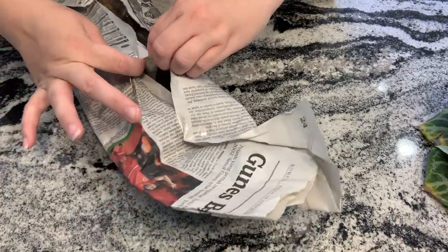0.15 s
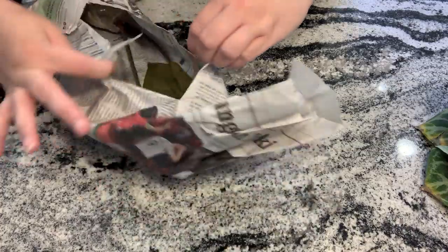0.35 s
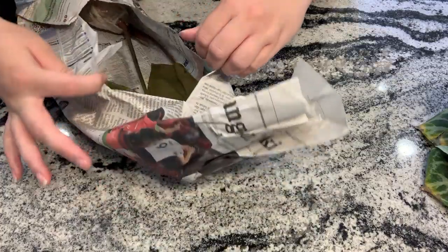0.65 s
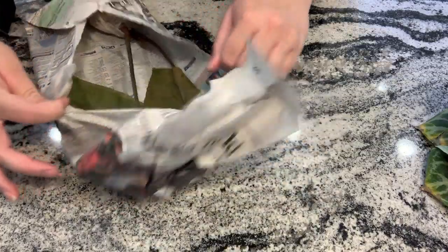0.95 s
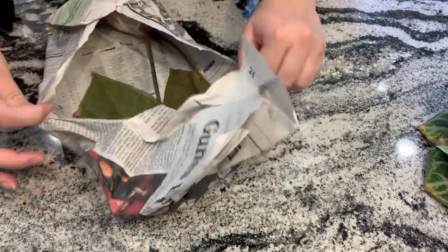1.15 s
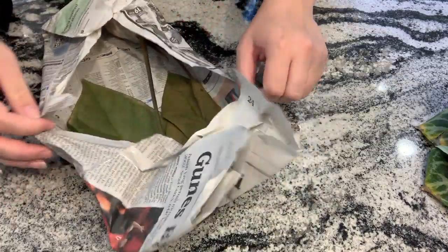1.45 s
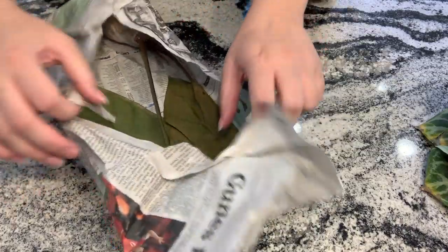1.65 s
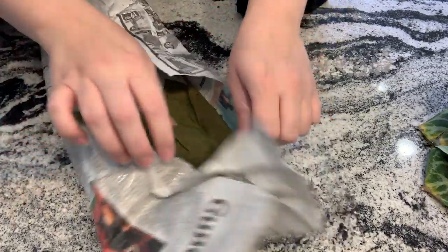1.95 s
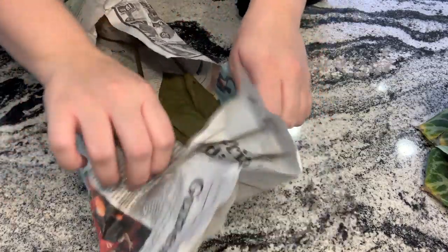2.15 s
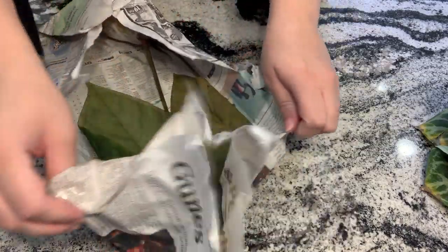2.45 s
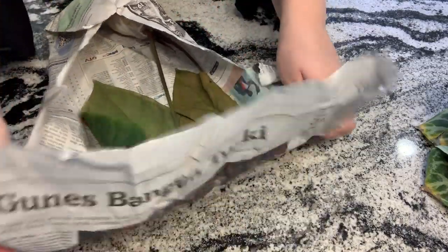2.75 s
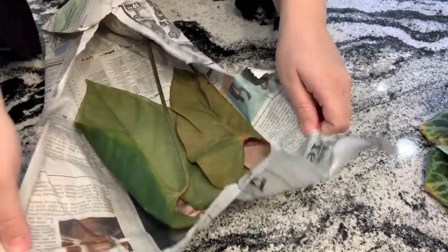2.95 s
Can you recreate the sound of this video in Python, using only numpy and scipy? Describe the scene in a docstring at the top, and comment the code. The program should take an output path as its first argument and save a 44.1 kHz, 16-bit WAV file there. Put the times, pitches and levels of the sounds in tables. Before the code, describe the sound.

Newspaper crinkles and snaps in uneven bursts as hands unfold it close by.

```python
"""A quiet kitchen-like room, where hands unfold crumpled newspaper on a stone counter close by.
Creases buckle in swarms of tiny clicks, each exciting a damped vibration in a small patch of the sheet.
Larger folds snap singly, and pockets of folded paper resonate as the sheet rattles.
The room answers each click with a short reverberant tail over a faint appliance hum."""
import sys
import numpy as np
from scipy import signal
from scipy.fft import rfft, irfft
from scipy.io import wavfile
from scipy.ndimage import uniform_filter1d

SR = 44100
rng = np.random.default_rng(int(sys.argv[2]) if len(sys.argv) > 2 else 0)


def store_wav(level_fs):
    """Save 16-bit WAV to argv[1]."""
    pcm = np.round(np.clip(np.atleast_2d(level_fs), -1, 1) * 32767)
    wavfile.write(sys.argv[1], SR, pcm.T.astype(np.int16))


N = 136710
RING_SAMPLES = 4096


def amp(db):
    """Decibels as an amplitude ratio."""
    return 10 ** (np.asarray(db) / 20)


def unit_rms(x):
    """Normalisation to unit mean power."""
    return x / np.sqrt(np.mean(x ** 2) + 1e-20)


def curve_at(points, hz):
    """Interpolation along a logarithmic frequency axis."""
    knots_hz, values = np.transpose(points)
    return np.interp(np.log(hz + 1), np.log(knots_hz + 1), values)


def ring(hz, cycles):
    """Damped vibration: a patch of paper swells to an envelope of 1 and dies in about the given cycles."""
    elapsed_cycles = np.arange(RING_SAMPLES) * hz / SR
    age = elapsed_cycles * 10 / max(cycles, 1)
    return age * np.exp(1 - age) * np.sin(2 * np.pi * elapsed_cycles)


def room_air(level_db=-71):
    """Ambient noise: a continuous spectrum that falls towards the treble."""
    # noise spectrum: frequency_hz, relative_db
    spectrum = [(18, -15), (30, 1), (569, -2), (740, -3.5), (1760, -6.5), (1910, -6.5), (3140, -10.5),
                (4910, -13), (5900, -17.5), (14800, -31), (16000, -50)]
    gain = amp(curve_at(spectrum, np.fft.rfftfreq(N, 1 / SR)))
    return amp(level_db) * unit_rms(irfft(rfft(rng.standard_normal(N)) * gain, N))


def appliance_hum():
    """Mains hum as narrow bands of noise, whose neighbouring components beat and so waver."""
    # hum partials: pitch_hz, width_hz, level_db
    partials = [(118, 11, -77), (238, 10, -82)]
    hz = np.fft.rfftfreq(N, 1 / SR)
    noise = rfft(rng.standard_normal(N))
    return sum(amp(level_db) * unit_rms(irfft(noise / (1 + (2 * (hz - pitch_hz) / width_hz) ** 2), N))
               for pitch_hz, width_hz, level_db in partials)


def reverberation(paper, patterns=4, first_echo_s=0.011, drift_hz=3.1):
    """Sparse reflections decay exponentially in each band; their pattern drifts as the paper moves."""
    # reverberation times: frequency_hz, t60_s
    decay_times = [(150, 0.23), (500, 0.27), (1500, 0.26), (4000, 0.27), (9000, 0.29), (15000, 0.11)]
    echoes = rng.choice([-1., 1.], (patterns, SR // 2)) * (rng.random((patterns, SR // 2)) < .1)
    hz, t, bands = signal.stft(echoes, SR, nperseg=256)
    decay = amp(-60 * t / curve_at(decay_times, hz)[:, None])
    tails = signal.istft(bands * decay, SR, nperseg=256)[1]
    tails[:, :int(first_echo_s * SR)] = 0
    tails /= np.linalg.norm(tails, axis=1)[:, None]
    turn = np.arange(N) / SR * drift_hz * patterns - np.arange(patterns)[:, None]
    offset = (turn + patterns / 2) % patterns - patterns / 2
    feeds = paper * np.cos(np.pi / 2 * np.clip(offset, -1, 1))  # equal-power crossfade
    return signal.fftconvolve(feeds, tails, axes=1).sum(0)[:N]


def hollow_folds(rattles_per_s=740):
    """Resonance: sparse, fading rattles excite two modes of a pocket of folded paper."""
    # pockets: start_s, t60_s, level_db, pitch_hz, upper_hz, upper_relative_db
    pockets = [(1.459, 0.16, -52.5, 1720, 2980, -5), (1.943, 0.3, -46, 1704, 4270, -2.5),
               (2.950, 0.48, -54.5, 1690, 3430, 4.5)]
    out, t = np.zeros(N + SR), np.arange(SR // 4) / SR
    for start_s, t60_s, level_db, hz, upper_hz, upper_db in pockets:
        chance, strength = rng.random((2, len(t)))
        rattle = (chance < rattles_per_s / SR) * (2 * strength - 1)
        upper_mode = amp(upper_db) * ring(upper_hz, cycles=12.7) * np.sqrt(upper_hz / hz)
        response = signal.fftconvolve(rattle, ring(hz, cycles=22) + upper_mode)[:len(t)]
        out[round(start_s * SR):][:len(t)] += amp(level_db - 60 * t / t60_s) * unit_rms(response)
    return out[:N]


def handling():
    """Excitation envelopes: each hand movement sets the crackle's level and colour, silent in between."""
    # one table per movement: time_s, level_db, flap_relative_db, fizz_relative_db,
    # crease_hz, flap_hz, crease_lift_db
    movements = [
        [(0.23, -25.5, -3.5, -8, 1950, 361, -5), (0.274, -28, -3.5, -12, 1580, 345, 2),
         (0.36, -36.5, -9.5, -14, 1570, 432, 1), (0.394, -42.5, -21, -10, 1844, 418, 4),
         (0.46, -48, -17, -16.5, 1670, 465, -5), (0.506, -55.5, -32, -36, 2100, 475, 6.5),
         (0.56, -75, -24, -10, 1970, 211, -13)],
        [(0.794, -47, 6, -24, 1690, 413, 15), (0.839, -32.5, -9.5, -11.5, 1340, 374, 3.5),
         (0.945, -32.5, -8.5, -11.5, 1400, 550, 3.5), (1.003, -23.5, -13, -17.5, 2220, 365, -4.5),
         (1.037, -29.5, -9, -11, 2200, 436, 1), (1.141, -37.5, -10, -12.5, 1950, 278, -1.5),
         (1.212, -40, -3, -9.5, 2310, 404, -1)],
        [(1.212, -27, -14, -13.5, 2550, 305, -19), (1.262, -41, -4, -8, 1550, 449, 6),
         (1.37, -42, -13, -11.5, 1570, 385, 1.5), (1.424, -64.5, -1, -9, 1640, 431, -7),
         (1.458, -43.5, -6.5, -16, 2270, 330, -5), (1.52, -61, -27, -11, 1890, 363, 3),
         (1.56, -97, -12, -14, 2430, 250, -13)],
        [(1.66, -69.5, -8, -7, 1250, 250, 6), (1.7, -58, -14, -7, 1420, 252, 0),
         (1.75, -66.5, -18, -8, 1760, 240, 10), (1.798, -70.5, 6, -13, 2390, 315, -2),
         (1.844, -50.5, -16, -10.5, 3160, 351, 5), (1.922, -74, -20, 3, 3330, 238, 2),
         (1.93, -60, -19, -12, 3160, 249, -5)],
        [(1.935, -50, -27, -27, 1680, 377, 13), (1.941, -57.5, -24, -11, 1690, 378, 17),
         (2.045, -67, -4, -13, 1620, 302, 0), (2.065, -58.5, -13, -16, 1290, 300, -2),
         (2.083, -49.5, -15, -33, 1240, 297, 0), (2.129, -61, -19, -19, 1740, 300, -1),
         (2.2, -64, 8, -3, 2210, 343, 4.0)],
        [(2.2, -52.5, -10, -7, 2710, 353, 6), (2.218, -50, -6, -19, 2800, 365, 10),
         (2.246, -39, -16, -6.5, 2750, 363, 7), (2.29, -39, -15, -6.5, 2270, 387, -1)],
        [(2.29, -30, -25, -6.5, 2800, 420, 2.5), (2.356, -33.5, -13, -7, 2610, 443, 2.5),
         (2.402, -35.5, -18, -7.5, 1610, 282, 2), (2.446, -33.5, -10, -7.5, 1820, 371, 1),
         (2.52, -32.5, -6.5, -9, 1520, 286, 1), (2.67, -35, -8.5, -10, 1850, 431, 0.5),
         (2.797, -40, -11, -10.5, 2080, 353, 2.5)],
        [(2.797, -34, -23, -12, 1840, 398, 0.5), (2.823, -35, -17.5, -12.5, 1840, 428, 6),
         (2.869, -47, -26, -13, 1790, 452, 0), (2.909, -50, -31, -10.5, 1700, 433, 4),
         (2.945, -58.5, -16, -7, 2050, 258, 14), (3.015, -56.5, -4, -11.5, 2030, 349, 5),
         (3.1, -66.5, -21, -3, 2500, 248, 2.5)],
    ]
    t = np.arange(N) / SR
    level_db, colour = np.full(N, -120.), np.ones((5, N))
    for rows in movements:
        times_s, levels_db, *columns = np.transpose(rows)
        begun = t >= times_s[0]
        moving = begun & (t <= times_s[-1])
        level_db[moving] = np.interp(t[moving], times_s, levels_db)
        colour[:, begun] = [np.interp(t[begun], times_s, column) for column in columns]
    return level_db, *colour


def crackle(clicks_per_s=26000, clumps_per_s=110, flap_top_hz=650, fizz_from_hz=5300, gain_db=-3.5):
    """Buckling as shot noise: clicks ring patches of the sheet, from large flaps to creases to fizz."""
    # spectrum of the sheet before its three bands are balanced: frequency_hz, relative_db
    sheet = [(60, -19), (107, -52), (160, -3), (320, -6.5), (600, -4.5), (1300, -0.5), (2800, -3),
             (3400, -4.5), (4400, -3), (5300, -9.5), (8500, -19), (11000, -22.5), (13500, -25),
             (15500, -27)]
    clump_db = 2.5 * unit_rms(uniform_filter1d(rng.standard_normal(N), SR // clumps_per_s))
    spread_db = 3 * np.minimum(rng.exponential(1, N), 4)
    clicks = amp(spread_db + clump_db) * (rng.random(N) < clicks_per_s / SR) * rng.choice([-1., 1.], N)
    pitches_hz = np.geomspace(65, 15000, 48)
    share = pitches_hz ** .45  # small patches buckle more often
    share /= share.sum()
    patch = np.searchsorted(np.cumsum(share), rng.random(N))
    level_db, flap_db, fizz_db, crease_hz, flap_hz, crease_lift_db = handling()
    bands = np.zeros((3, N))
    for k, hz in enumerate(pitches_hz):
        hits, train = np.flatnonzero((patch == k) & (clicks != 0)), np.zeros(N)
        # the level shifts within about a third of an octave of the crease and flap pitches
        near_crease, near_flap = np.exp(-(np.log2(hz / np.array([crease_hz[hits], flap_hz[hits]])) / .33) ** 2)
        train[hits] = clicks[hits] * amp(crease_lift_db[hits] * near_crease + 7.5 * near_flap)
        grain = ring(hz, cycles=12.4 * (hz / 1000) ** .21)  # small patches ring for more cycles
        grain *= amp(curve_at(sheet, hz)) * np.sqrt(hz / share[k]) / np.linalg.norm(grain)
        bands[int(hz > flap_top_hz) + int(hz > fizz_from_hz)] += signal.oaconvolve(train, grain)[:N]
    flap, crease, fizz = map(unit_rms, bands)
    envelope = uniform_filter1d(amp(gain_db + level_db), size=SR // 500)
    return envelope * (crease + amp(flap_db) * flap + amp(fizz_db) * fizz)


def driven(mode, force):
    """Forced response: a mode convolved with a force, keeping the mode's own mean power."""
    return unit_rms(signal.fftconvolve(mode, force)[:RING_SAMPLES]) * np.sqrt(np.mean(mode ** 2))


def snaps(give_s=0.001212, gain_db=-3.5, thump_gain_db=-6.5, tick_gain_db=20):
    """Snap-through: a fold gives way in a brief stutter, with a pitched crack, low thump and bright tick."""
    # folds, before the gains: start_s, level_db, pitch_hz, thump_relative_db, tick_relative_db, thump_hz
    folds = [(0.009, -50, 1250, 1.5, -21, 162), (0.046, -45, 1470, 2, -20, 460),
             (0.124, -41, 970, -7.5, -33, 164), (0.23, -20, 4550, -7, -28, 136),
             (0.232, -18.5, 1480, -4, -30, 306), (0.242, -10.5, 2730, -22, -19, 312),
             (0.256, -18, 2260, -35, -18, 272), (0.27, -15.5, 1450, -23, -28, 258),
             (0.297, -23, 1630, -11, -14, 408), (0.344, -25.5, 1150, -22, -18, 493),
             (0.659, -54.5, 1110, -11, -33, 254), (0.707, -50, 1470, -20, -30, 417),
             (0.785, -32, 2000, 0.5, -45, 375), (0.832, -15.5, 2500, -6, -27, 386),
             (0.841, -23.5, 1210, -3.5, -23, 357), (0.874, -21, 1340, -7, -16.5, 490),
             (0.896, -27, 1210, -15, -16, 373), (0.934, -19, 1190, -2, -20, 540),
             (0.957, -24.5, 3000, -31, -9.5, 563), (0.981, -17, 3500, -13, -23, 410),
             (0.998, -23, 1270, -5, -12, 204), (1.027, -14.5, 3450, -10, -34, 605),
             (1.101, -18, 2690, -13.5, -25, 158), (1.123, -30, 1220, 0.5, -17, 350),
             (1.212, -15.5, 2630, -20, -24, 353), (1.263, -28.5, 800, -5, -19, 433),
             (1.321, -31.5, 790, -26, -14, 412), (1.339, -29, 1190, -5, -16.5, 417),
             (1.453, -45, 1630, -7, -29, 322), (1.571, -47.5, 1110, -29, -37, 250),
             (1.691, -48, 1060, 1, -19, 260), (1.829, -39.5, 3300, -8, -31, 530),
             (1.845, -33, 3400, -16, -28, 264), (1.936, -38, 1810, -37, -45, 151),
             (1.943, -37.5, 1780, -23, -38, 410), (2.077, -36.5, 1490, -2, -38, 300),
             (2.203, -42, 2460, 1.5, -28, 332), (2.218, -37, 2300, -21, -40, 483),
             (2.238, -21, 3460, -18, -37, 385), (2.289, -15.5, 3300, -33, -46, 433),
             (2.325, -17, 2900, -23, -15, 300), (2.351, -16, 4520, -17, -32, 476),
             (2.405, -22.5, 1230, -13.5, -13, 153), (2.479, -24.5, 2480, 2.5, -21, 293),
             (2.502, -25.5, 860, 0.5, -7, 488), (2.601, -25.5, 2620, -24, -6, 410),
             (2.636, -25, 2580, -30, -27, 443), (2.658, -25, 1700, -12, -11, 330),
             (2.708, -28, 1490, 5, -11, 426), (2.758, -33, 2010, -0.5, -11, 324),
             (2.787, -32, 2000, 2, -7, 370), (2.798, -26.5, 1560, -6, -28, 400),
             (2.817, -29.5, 2420, -2.5, -36, 520), (2.888, -32.5, 1460, -40, -39, 403),
             (2.939, -35, 2200, -21, -34, 250), (3.039, -45.5, 1620, -19, -25, 398)]
    out, t = np.zeros(N + RING_SAMPLES), np.arange(400) / SR
    for start_s, level_db, hz, thump_db, tick_db, thump_hz in folds:
        stutter = rng.standard_normal(len(t)) * t / give_s * np.exp(-t / give_s)
        stutter *= 1.04 / np.linalg.norm(stutter)
        stutter[round(give_s * SR)] += .5  # one clean impulse at the crest
        opening_click = amp(-1.5) * ring(1.54 * hz, cycles=4.4)
        crack = driven(ring(hz, cycles=7.9) + opening_click, stutter)
        tick = amp(tick_db + tick_gain_db) * driven(ring(hz=10100, cycles=3.1), stutter)
        thump = amp(thump_db + thump_gain_db) * ring(thump_hz, cycles=10)
        out[round(start_s * SR):][:RING_SAMPLES] += amp(level_db + gain_db) * (crack + tick + thump)
    return out[:N]


def scene(low_cut_hz=55, room_db=-5.5):
    """Superposition of paper, reflections and background; a thin sheet radiates no deep bass."""
    low_cut = signal.butter(3, low_cut_hz, "high", fs=SR, output="sos")
    paper = signal.sosfilt(low_cut, crackle() + snaps() + hollow_folds())
    return (paper + amp(room_db) * reverberation(paper) + room_air() + appliance_hum())[None]


def record(dry):
    """Band limiting: a steep low-pass removes the highest treble."""
    low_pass = signal.firwin(511, cutoff=15750, window=("kaiser", 9), fs=SR)
    return signal.oaconvolve(dry, low_pass[None], "same")


dry = scene()
out = record(dry)
store_wav(out)
```